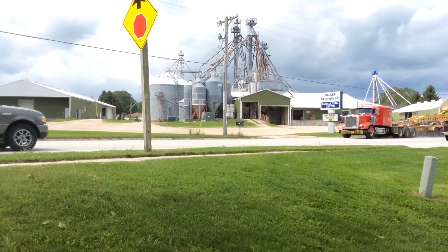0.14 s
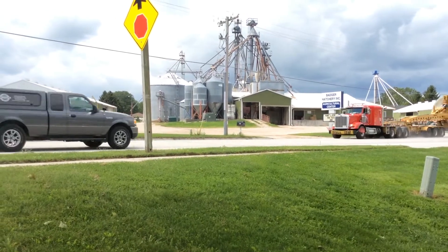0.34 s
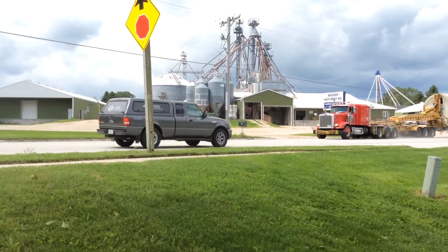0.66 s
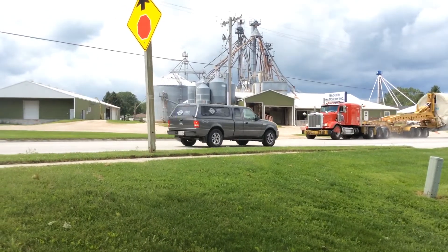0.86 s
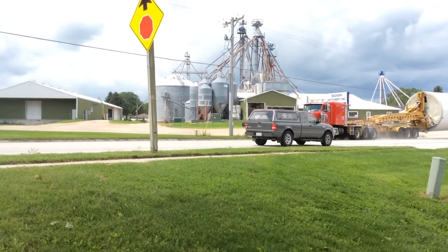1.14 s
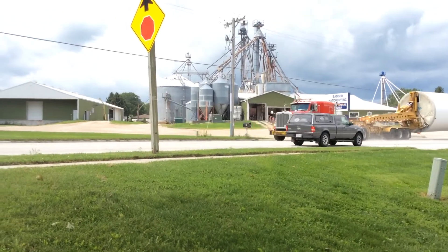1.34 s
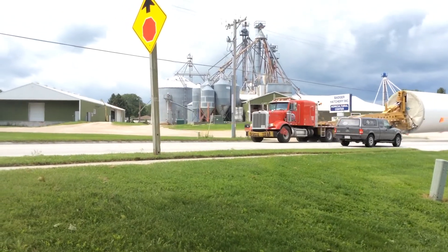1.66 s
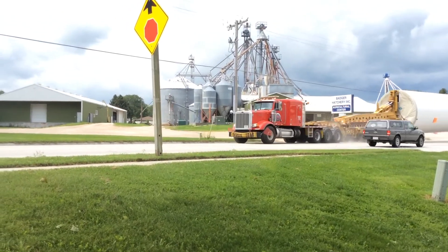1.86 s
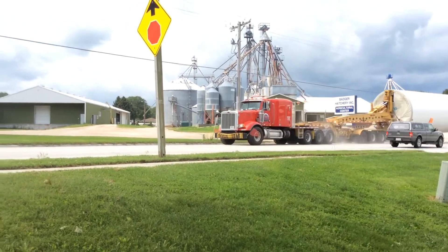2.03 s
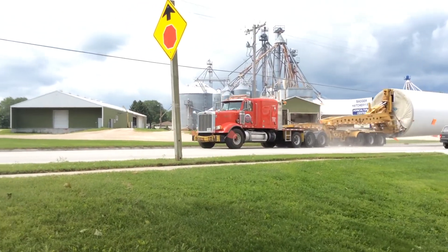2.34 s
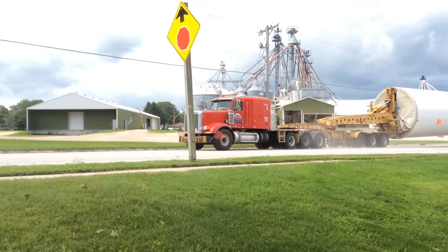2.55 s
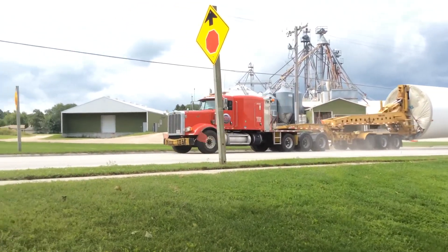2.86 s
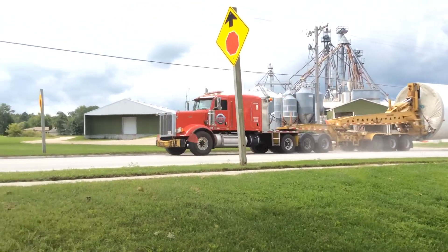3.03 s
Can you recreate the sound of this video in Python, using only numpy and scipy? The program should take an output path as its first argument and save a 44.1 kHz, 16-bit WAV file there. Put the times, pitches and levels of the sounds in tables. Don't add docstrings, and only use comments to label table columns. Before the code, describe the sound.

A heavy diesel lorry roars nearer with a rising turbo whistle as a pickup passes

```python
import sys
import numpy as np
from scipy import signal
from scipy.fft import rfft, irfft, next_fast_len
from scipy.io import wavfile
from scipy.ndimage import uniform_filter1d, map_coordinates

SR = 44100
rng = np.random.default_rng(int(sys.argv[2]) if len(sys.argv) > 2 else 0)


def ratio_of_db(decibels):
    return 10 ** (np.asarray(decibels, float) / 20)


def dump(signal):
    limited = np.clip(np.atleast_2d(signal).T, -1, 1)
    pcm = np.round(limited * 32767).astype(np.int16)
    wavfile.write(sys.argv[1], SR, pcm)


N = 141120


def unit(x):
    return x / np.sqrt(np.mean(x ** 2) + 1e-20)


def curves(rows):
    times, *columns = np.transpose(rows)
    t = np.arange(N) / SR
    return [np.interp(t, times, column) for column in columns]


def wobble(rate):
    knots = rng.standard_normal(4000)
    return map_coordinates(knots, [np.arange(N) * min(rate, 1200) / SR])


def filtered(x, gain):
    size = next_fast_len(N + SR // 4)
    hz = np.fft.rfftfreq(size, 1 / SR)
    return irfft(rfft(x, size) * gain(hz), size)[:N]


def coloured(x, points):
    f, db = np.transpose(points)
    return unit(filtered(x, lambda hz: ratio_of_db(np.interp(np.log(hz + 1), np.log(f + 1), db))))


def rush(points, patchy_db):
    z = signal.stft(rng.standard_normal(N), nperseg=512)[2]
    patches = uniform_filter1d(rng.standard_normal(z.shape), size=6, axis=0)
    patches = uniform_filter1d(patches, size=8, axis=1)
    noise = signal.istft(z * ratio_of_db(patchy_db * unit(patches)), nperseg=512)[1][:N]
    return coloured(noise, points)


def tone(hz, flutter_db, rate, waver):
    phase = 2 * np.pi * np.cumsum(hz * (1 + waver * wobble(rate))) / SR
    return unit(ratio_of_db(flutter_db * wobble(rate)) * np.sin(phase))


# (time [s], level [dB])
BREEZE = [(0, -48.5), (.13, -44), (.2, -38.5), (.3, -48), (.42, -38.5), (.56, -40.5), (.75, -43.5),
          (.95, -45), (1.2, -39), (1.33, -50), (1.8, -44), (2.05, -42.5), (2.3, -44.5), (2.6, -43),
          (2.75, -53), (2.97, -37.5), (3.2, -46)]
# (frequency [Hz], level [dB])
BUFFET = [(12, -60), (25, -19), (42, -6), (58, 0), (85, -1), (160, -6), (300, -15), (600, -60)]
# (time [s], peak level [dB], frequency [Hz])
THUDS = [
    (.2, -31, 80),
    (.268, -30, 89.5),
    (.575, -28, 201.3),
    (1.055, -29, 119.2),
    (1.115, -28.5, 150),
    (1.142, -29, 230),
    (1.192, -30.5, 112),
    (1.254, -27.5, 90.7),
    (2.990, -22, 74),
]


def breeze():
    strength_db, = curves(BREEZE)
    lumps = ratio_of_db(1.4 * wobble(24))
    air = ratio_of_db(strength_db + 1.5) * unit(lumps * rush(BUFFET, patchy_db=0.5))
    t = np.arange(N) / SR
    for k, (start, peak_db, hz) in enumerate(THUDS):
        cycles = (t - start) * hz
        sign = -1 if k in (6, 7) else 1
        thud = np.exp(-(cycles / 0.6) ** 2) * np.cos(2 * np.pi * cycles)
        air = air + sign * ratio_of_db(peak_db) * thud
    return air


def over_grass(x, path):
    def gain(f):
        return ratio_of_db(sum(db * np.exp(-((f - hz) / width) ** 2) for hz, width, db in path))
    return filtered(x, gain)


# (frequency [Hz], width [Hz], level [dB])
PATH = [(478, 50.5, -7.5), (538, 76, 5), (631, 51, 3), (910, 86, 1.5), (980, 81, 3), (1375, 116, 7.5),
        (1744, 157, 4.5), (2065, 78, 5), (2260, 170, -1)]
# (time [s], level [dB], tread hum [Hz])
PICKUP = [
    (0, -48.5, 298.2),
    (.2, -41.5, 292),
    (.55, -45, 280),
    (.8, -46, 270),
    (1.15, -49, 262),
    (1.35, -49.5, 260),
    (2, -56.5, 258.7),
    (3.2, -70, 256),
]
# (frequency [Hz], level [dB per Hz])
TYRES = [(59, -26), (100, 2.5), (282, -4), (495, -15), (587, -8), (695, -43.5), (1420, -16.5),
         (2600, -23.5), (9000, -29), (11700, -48), (19800, -120)]


def pickup():
    level_db, hum_hz = curves(PICKUP)
    hum = ratio_of_db(-7) * tone(hum_hz, flutter_db=2.5, rate=8, waver=.004)
    tyres = over_grass(rush(TYRES, patchy_db=-1.5), PATH)
    return ratio_of_db(level_db) * (tyres + hum)


# (frequency [Hz], level [dB])
PIPE = [(25, -46), (55, 4.5), (110, -0.5), (220, -1.5), (400, -26), (800, -16), (2000, -72)]
FIRING_HZ, JITTER, SCATTER_DB, THROB_DB = 54.8, 0.0499, 2.5, -7


def exhaust():
    firings = np.cumsum(FIRING_HZ * (1 + JITTER * wobble(40))) / SR
    puffs = np.diff(np.floor(firings), prepend=0) * ratio_of_db(SCATTER_DB * wobble(60))
    return coloured(puffs, PIPE) + ratio_of_db(THROB_DB) * np.sin(2 * np.pi * firings)


# (time [s], level [dB])
LORRY = [(0.0, -51.5), (0.35, -50), (0.4, -52), (0.76, -51.5), (0.98, -52.5), (1.03, -50.5), (1.38, -54.5),
         (1.51, -52), (1.56, -49.5), (2.17, -47), (2.28, -49), (2.5, -47), (2.64, -47), (2.8, -45.5),
         (3.2, -46)]
# (frequency [Hz], level [dB per Hz])
ROAR = [(88, -25), (150, 2), (460, -7), (640, -4.5), (880, -15), (1100, -6), (2600, -23), (7000, -47)]
# (frequency [Hz], level [dB per Hz])
HISS = [(1200, -30), (2200, -10.5), (7000, -9), (7900, -3.5), (9300, -6), (10000, -12.5), (13200, -23.5),
        (15200, -33)]
# (frequency [Hz], width [Hz], level [dB])
CLOSE = [(397, 74, 5), (664, 30, 1.5), (1000, 51, 4.5), (1390, 200, -2)]
CLOSE_FROM_S, CLOSE_RISE_S = 2.32, 0.6
ROAR_DB, ROAR_GROWS, HISS_DB, HISS_GROWS = 4.5, 1.12, 4, 1.05
EXHAUST_DB, EXHAUST_GROWS = 3, 0.3
GEAR_HZ, GEAR_DB, GEAR_STARTS_S, GEAR_RISE_S = 525.4, -5.5, 1.53, 0.64


def lorry():
    level_db, = curves(LORRY)
    mean_db = level_db.mean()
    swing_db = level_db - mean_db
    t = np.arange(N) / SR
    shake_db = 0.47 * wobble(9.17) + 0.27 * wobble(22.36)
    roar_db = ROAR_DB + ROAR_GROWS * swing_db + shake_db
    roar = ratio_of_db(roar_db) * rush(ROAR, patchy_db=1.5)
    hiss_db = HISS_DB + HISS_GROWS * swing_db + .5 * shake_db + 0.33 * wobble(25.18)
    hiss = ratio_of_db(hiss_db) * rush(HISS, patchy_db=0.9)
    far = over_grass(roar + hiss, PATH)
    near = np.clip((t - CLOSE_FROM_S) / CLOSE_RISE_S, 0, 1)
    engine = (1 - near) * far + near * over_grass(far, CLOSE)
    load = np.clip((t - GEAR_STARTS_S) / GEAR_RISE_S, .15, 1)
    gear = load * ratio_of_db(GEAR_DB + swing_db) * tone(GEAR_HZ, flutter_db=3, rate=9, waver=.003)
    puffing = ratio_of_db(EXHAUST_DB + EXHAUST_GROWS * swing_db) * exhaust()
    return ratio_of_db(mean_db) * (engine + gear + puffing)


def whistle(hz, scattered, rate):
    phase = 2 * np.pi * np.cumsum(hz) / SR
    in_step, out_of_step = scattered * wobble(rate), scattered * wobble(rate)
    smeared = (1 + in_step) * np.sin(phase) + out_of_step * np.cos(phase)
    return unit(ratio_of_db(1.8 * wobble(26)) * smeared)


# (time [s], shaft speed [turns/s], 7-blade whistle level [dB], 11-blade level [dB])
TURBO = [(0, 830, -74, -68), (.42, 876, -70, -61), (.7, 901, -70, -76), (.9, 921, -69, -74),
         (1.1, 941, -68, -62), (1.3, 965, -68, -78), (1.72, 1034, -62, -76), (1.87, 1066, -52, -77),
         (2.2, 1146, -51.5, -78), (2.45, 1180, -51, -79), (2.75, 1226, -47.5, -79), (3.2, 1287, -44, -80)]
SCATTERED, SCATTER_RATE = .72, 65
WHOOSH_DB, WHOOSH_RATE = -64, 1100


def turbo():
    turns, low_db, high_db = curves(TURBO)
    low = ratio_of_db(low_db) * whistle(turns * 7, SCATTERED, SCATTER_RATE)
    high = ratio_of_db(high_db) * whistle(turns * 11, SCATTERED, SCATTER_RATE)
    whoosh_db = WHOOSH_DB + .5 * (low_db - low_db.max())
    whoosh = ratio_of_db(whoosh_db) * whistle(turns * 11, 9, WHOOSH_RATE)
    return low + high + whoosh


def scene():
    mono = breeze() + pickup() + lorry() + turbo()
    return np.tile(mono, (2, 1))


TOP_HZ = 15270
MUTE_FROM_HZ, MUTE_DB, MUTE_GROWS, KEEP_HZ = 12500, -24.5, .35, 15100


def mute_faint_top(x):
    hz, _, z = signal.stft(x, SR, nperseg=2048, window="cosine")
    power = uniform_filter1d(abs(z) ** 2, size=5, axis=0)
    hiss_band = (hz > 7000) & (hz < 10000)
    hiss_db = 10 * np.log10(power[hiss_band].mean(axis=0) + 1e-20)
    limit_db = hiss_db + MUTE_DB + MUTE_GROWS * (hiss_db - np.median(hiss_db))
    faint = power < ratio_of_db(2 * limit_db)
    spared = (hz[:, None] > KEEP_HZ) & (rng.random(z.shape[1]) < .5)
    muted = (hz[:, None] > MUTE_FROM_HZ) & faint & ~spared
    return signal.istft(z * ~muted, SR, nperseg=2048, window="cosine")[1][:N]


def band_limit(x):
    return signal.sosfilt(signal.butter(12, 15270, fs=SR, output="sos"), x)


def record(dry):
    mono = mute_faint_top(filtered(dry[0], lambda hz: hz < TOP_HZ))
    return band_limit(np.array([mono, mono]))


dry = scene()
out = record(dry)
dump(out)
```